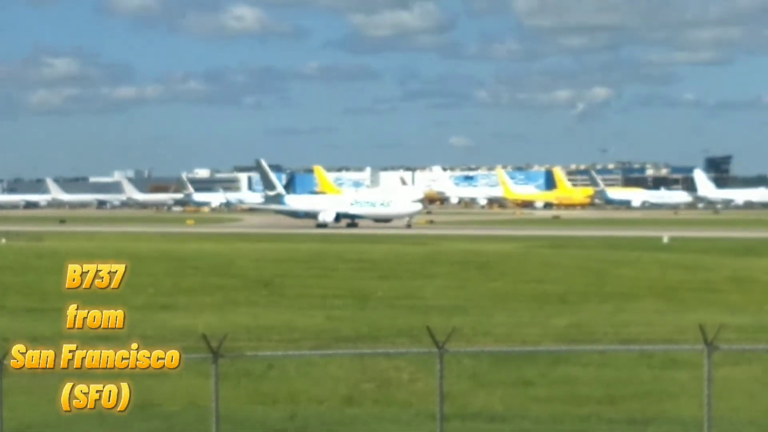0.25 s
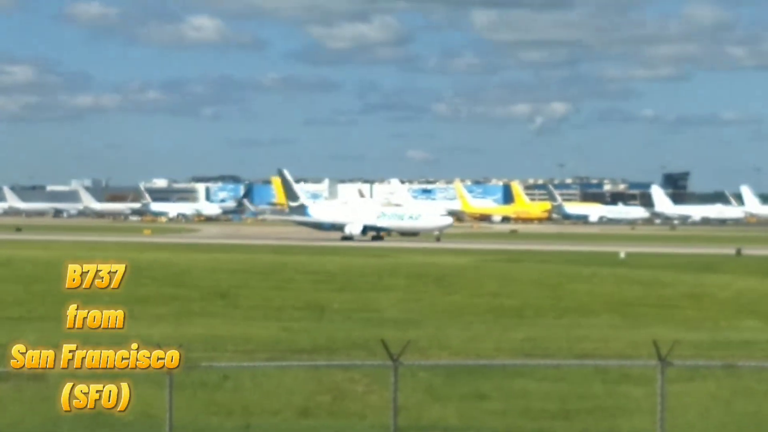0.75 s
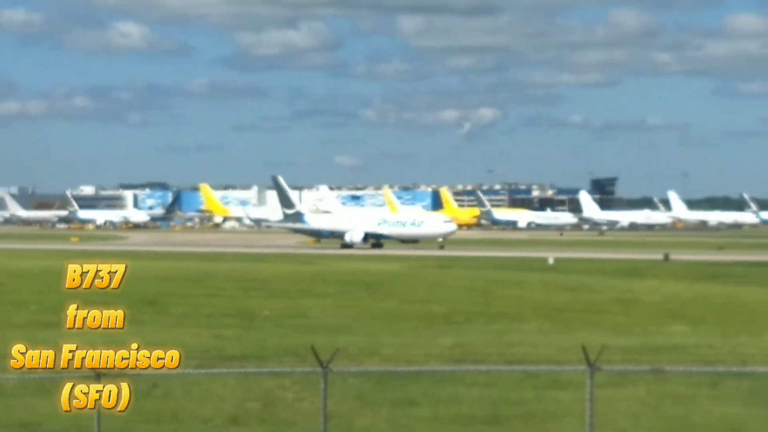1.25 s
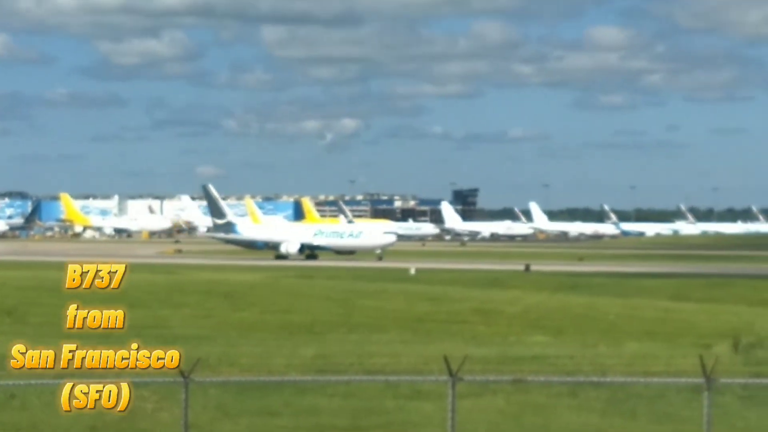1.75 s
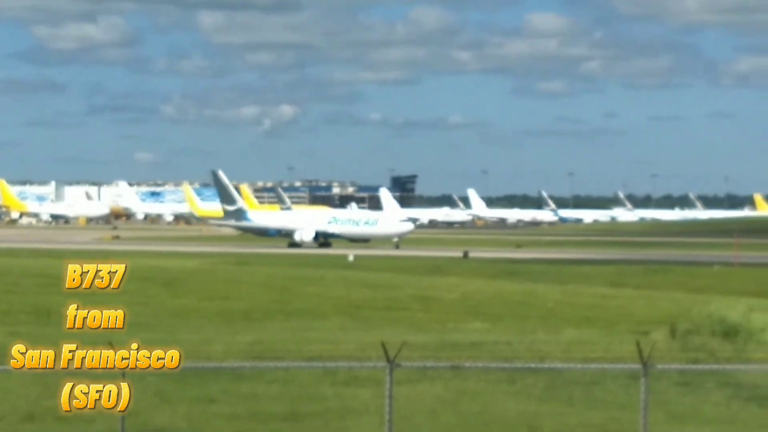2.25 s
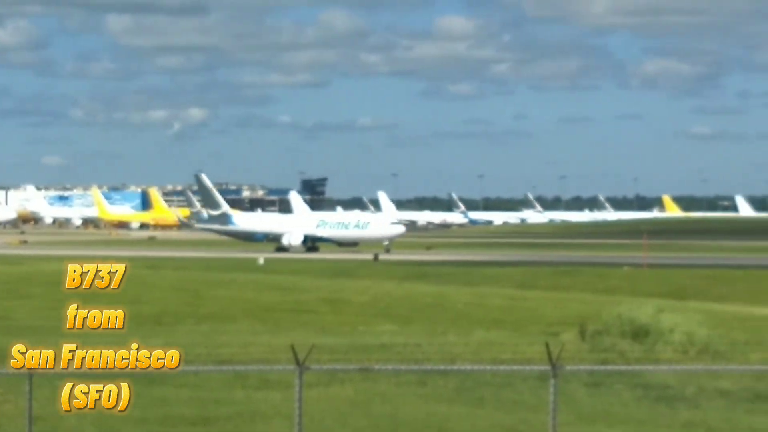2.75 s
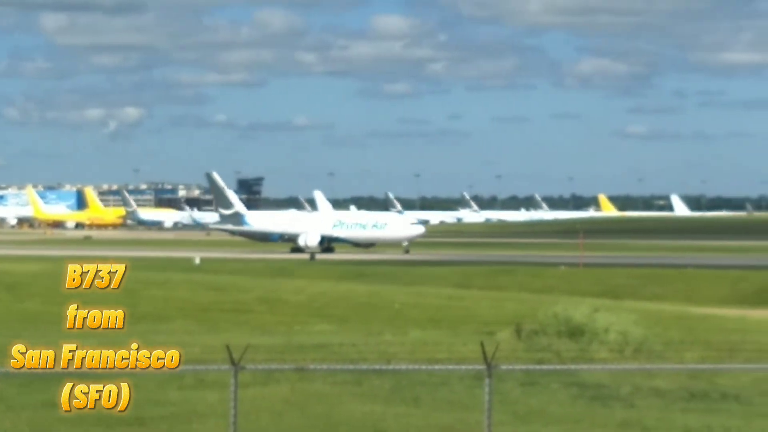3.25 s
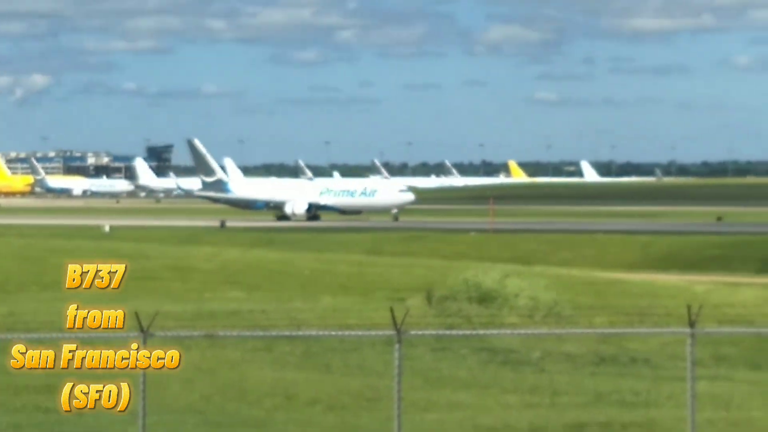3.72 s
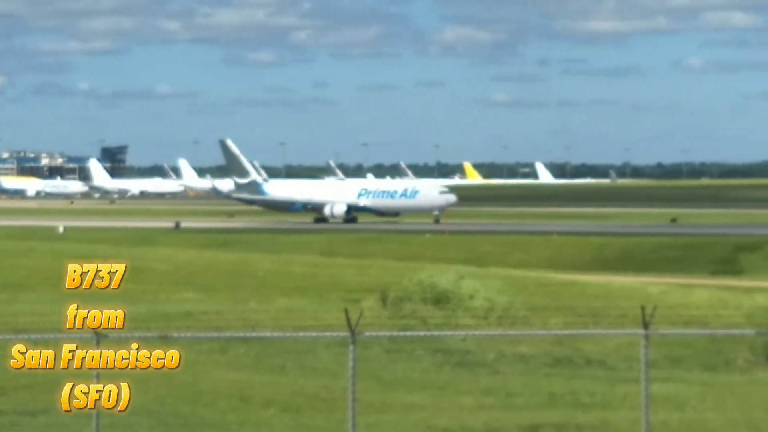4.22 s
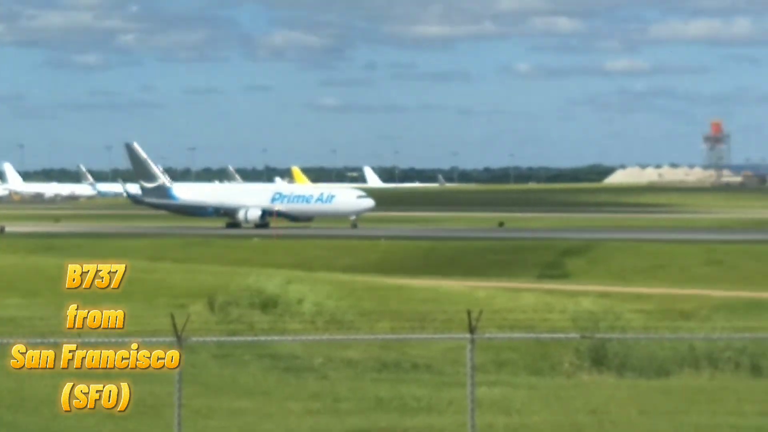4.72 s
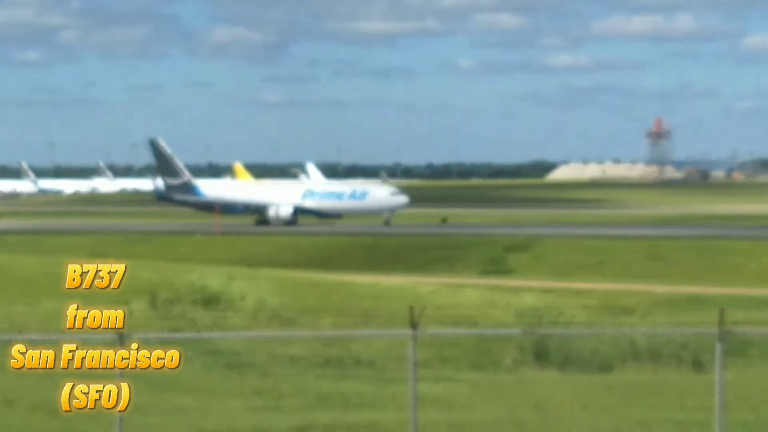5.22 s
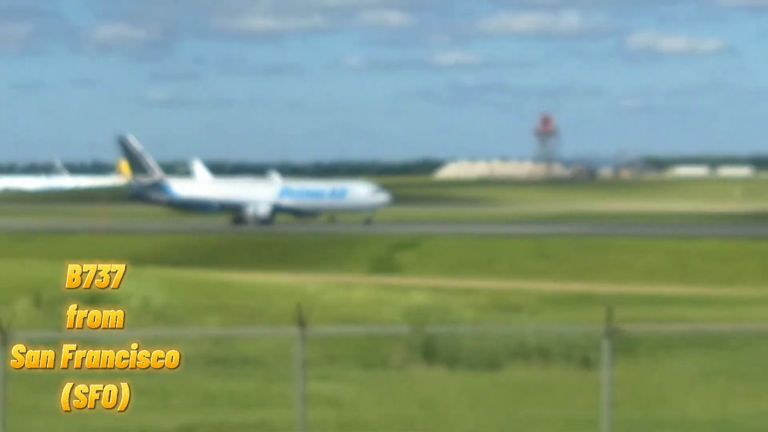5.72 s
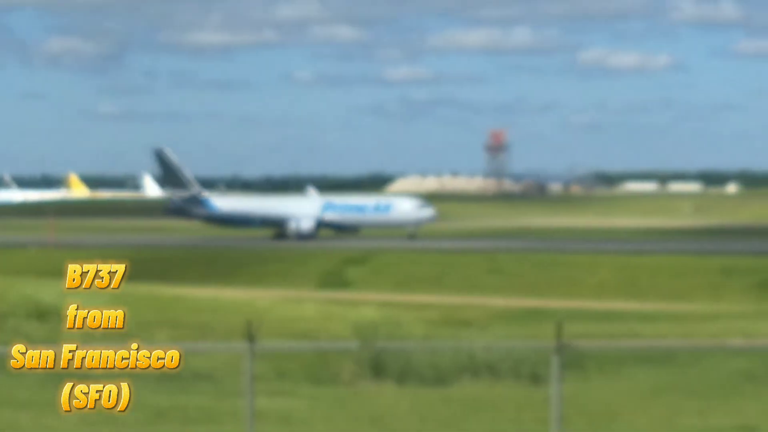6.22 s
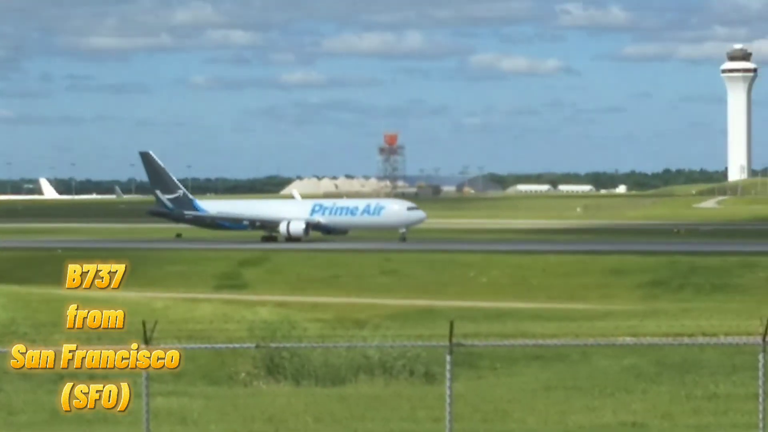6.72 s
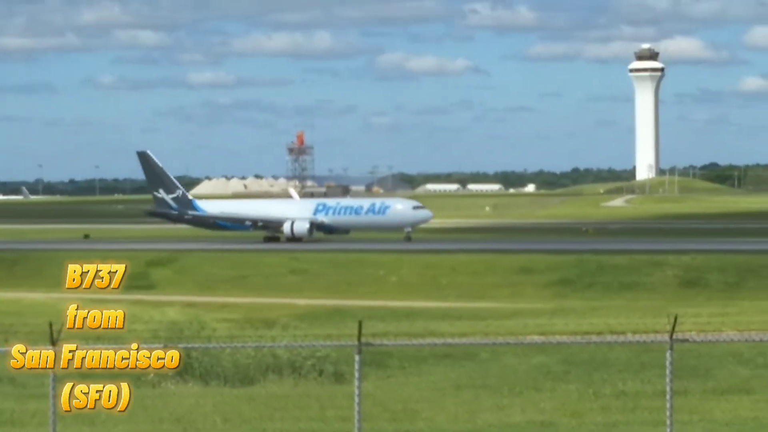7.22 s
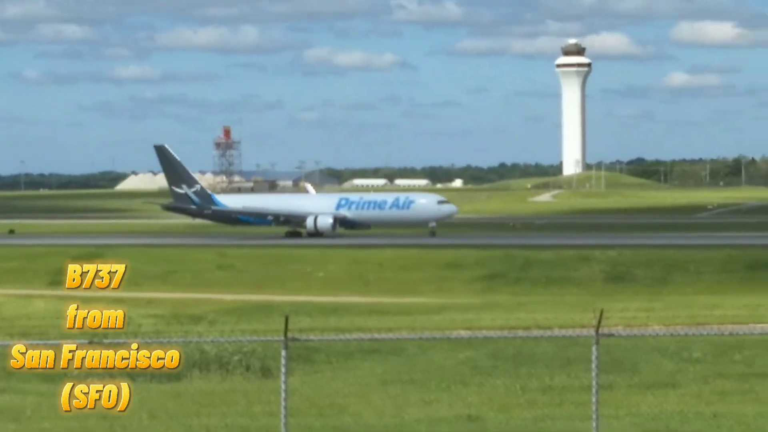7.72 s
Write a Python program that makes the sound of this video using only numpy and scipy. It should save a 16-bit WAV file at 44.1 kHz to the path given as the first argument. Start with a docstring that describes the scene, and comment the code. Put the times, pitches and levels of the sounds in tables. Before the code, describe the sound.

Wind buffets a phone microphone with low thuds as a far-off cargo jet rolls past, its steady whine sinking lower as the engines ease back.

```python
"""Cargo jet rolling past in wind

A twin-engined cargo jet rolls along a runway a few hundred metres off, heard across grass from a phone.
Coloured noise makes the exhaust roar, fan rush and turbine hiss; blade tones whine, then slide down in
pitch as the engines spool back. Wind rumbles, buffets and thumps on the phone's two ports as gusted noise
and short pulses, over soft rustles and thin hiss. The ports are cross-fed to widen the stereo."""
import sys
import numpy as np
from scipy import signal
from scipy.fft import rfft, irfft, next_fast_len
from scipy.io import wavfile
from scipy.ndimage import uniform_filter1d

SR = 44100
rng = np.random.default_rng(int(sys.argv[2]) if len(sys.argv) > 2 else 0)


def wav_out(sig):
    """Save sig, one row per channel (or a flat mono array), as 16-bit PCM at SR to the path in sys.argv[1]."""
    wavfile.write(sys.argv[1], SR, np.round(np.clip(np.atleast_2d(sig).T, -1, 1) * 32767).astype(np.int16))


N = 351023
SIZE = next_fast_len(N)
TIME, HZ = np.arange(N) / SR, np.arange(SIZE // 2 + 1) * SR / SIZE


def undb(db):
    """Decibels to amplitude gain."""
    return 10 ** (np.asarray(db) / 20)


def curve(rows):
    """Second column of a table, joined by straight lines in time."""
    time_s, value = np.transpose(rows)
    return np.interp(TIME, time_s, value)


def colour(points):
    """Gain at each frequency from (Hz, dB) points, joined over log frequency."""
    hz, db = np.transpose(points)
    return undb(np.interp(np.log(HZ + 1), np.log(hz), db))


def shape(x, gain):
    """Filter by a gain at each frequency."""
    return irfft(rfft(x, SIZE) * gain, SIZE)[..., :N]


def unit(x):
    """Scale to rms 1."""
    return x / np.sqrt(np.mean(x ** 2))


def noise(channels=2):
    """Unrelated white noises."""
    return rng.standard_normal((channels, N))


def walk(rate_hz):
    """Smooth random signal of rms 1, noise low-passed around rate_hz."""
    return unit(shape(noise(channels=1)[0], np.exp(-.5 * (HZ / rate_hz) ** 2)))


def even(x, span_s):
    """Noise with its own slow swells taken out."""
    power = uniform_filter1d(np.mean(x ** 2, axis=0), max(int(span_s * SR), 2))
    return x / np.sqrt(np.abs(power) + 1e-12)


def delay(ms):
    """Response of a pure delay."""
    return np.exp(-2j * np.pi * HZ * ms / 1000)


CROSS_LAG_MS, CROSS_FEED = 0.4278, 0.82


def widen(left, right):
    """Response of both channels: each port has the other, delayed, subtracted; mean power stays flat."""
    cross = CROSS_FEED * delay(CROSS_LAG_MS)
    pair = np.array([left - cross * right, right - cross * left])
    return pair / np.sqrt(np.mean(np.abs(pair) ** 2, axis=0) + 1e-12)


def at_ports(pair, gain=1):
    """Two unrelated signals, one on each port, then cross-fed."""
    return shape(pair[0], gain * widen(1, 0)) + shape(pair[1], gain * widen(0, 1))


# Left-right balance set by the phone's body, before cross-feed.
# Each row: frequency in Hz, left over right in dB.
BODY_BALANCE = [(100, -15), (900, 4), (1150, -15.5), (1350, 11), (1650, 0), (1900, 13.5), (2150, 5),
                (2400, 44), (3000, -5), (8000, 17.5)]
PORT_LAG_MS = 0.11


def from_runway(x, gain=1):
    """Far sound reaches the left port a little before the right."""
    return shape(x, gain * widen(colour(BODY_BALANCE), delay(PORT_LAG_MS)))


def far_noise(spectrum, scatter_db):
    """Jet noise at rms 1: a direct part and one scattered by the field, whose share grows in the bass."""
    gain = colour(spectrum)
    scatter = undb(scatter_db) + (260 / (HZ + 50)) ** 2
    gain = gain / np.sqrt(1 + scatter ** 2)
    direct = from_runway(noise(channels=1)[0], gain)
    scattered = at_ports(noise(), gain * scatter)
    return unit(direct + scattered)


def aircraft():
    """Exhaust roar, fan rush, whine and turbine hiss share one loudness as the jet rolls by."""
    return (roar() + rush() + whine() + turbine_hiss()) * undb(loudness())


# Aircraft level before dips. Each row: time in seconds, relative level in dB.
ROLL_BY = [(0, -40), (.8, -38.5), (1.3, -37.5), (2, -40), (3.15, -34.5), (3.7, -35.5), (4.6, -39),
           (5.05, -37.5), (5.8, -41.5), (6.7, -43.5), (7.95, -42.5)]
# Abrupt level dips. Each row: time in seconds, depth in dB.
DIPS = [(0.391, 3), (.85, 6.5), (1.36, 5.5), (1.5, 7), (3.24, 3.5), (3.37, 2), (3.64, 3), (3.8, 1),
        (4.2, 1), (5.14, 1.5), (5.36, 3), (5.65, 0.5), (5.82, 5), (6.715, 5.5), (7.51, 3.5), (7.66, 5)]
DIP_ATTACK_S, DIP_HOLD_S, DIP_RECOVERY_S = 0.013, 0.091, 0.93


def loudness():
    """Aircraft level in dB; each dip drops abruptly, stays down, then creeps back exponentially."""
    db = curve(ROLL_BY)
    for s, depth_db in DIPS:
        fall = np.clip((TIME - s) / DIP_ATTACK_S + .5, 0, 1)
        recovery = np.exp(-np.maximum(TIME - s - DIP_HOLD_S, 0) / DIP_RECOVERY_S)
        db = db - depth_db * fall * recovery
    return db


# Exhaust spectrum. Each row: frequency in Hz, relative density in dB.
ROAR_SPECTRUM = [(50, -18), (100, 6.5), (200, 6), (330, -3.5), (470, -4), (680, 2), (820, -0.5), (1000, -5),
                 (1400, -1.5), (1700, -7), (2200, -1.5), (3500, -67.5), (9000, -83)]
# Weight of the roar in the jet. Each row: time in seconds, relative level in dB.
THRUST = [(0, 7.5), (2.6, 4.5), (3.2, 4.5), (5, 6), (5.7, 4), (7, 2.7), (7.95, 2.5)]


def roar():
    """Low exhaust noise whose level wavers at a slow and a faster rate."""
    level_db = curve(THRUST) + 11.5 + 1.45 * walk(3.3) + 0.41 * walk(18)
    return far_noise(ROAR_SPECTRUM, scatter_db=-41.0) * undb(level_db)


# Fan noise spectrum. Each row: frequency in Hz, relative density in dB.
RUSH_SPECTRUM = [(400, -8.5), (1200, 0.5), (1800, -6.5), (2200, -5), (2500, 4), (3000, -0.5), (3500, -6.5),
                 (4000, -11.5), (5000, -22), (6000, -35.5), (7000, -56), (9000, -59)]


def rush():
    """Broad fan noise, gently wavering."""
    return far_noise(RUSH_SPECTRUM, scatter_db=-5.5) * undb(8.5 + 0.69 * walk(5.1))


# Both engines. Each row: spool-back time in seconds, blade-passing frequency at first in Hz,
# relative level in dB, blur in Hz, steady amplitude share from 0 to 1.
ENGINES = [(4.88, 2140, 0, 26, .72), (5.26, 2150, -4, 62, .25)]
# Level of the blade tones in the jet. Each row: time in seconds, relative level in dB.
WHINE_LEVEL = [(0, 5), (1.8, 3.5), (2.6, 6), (4, 5), (4.8, 7), (5.12, 11.5), (5.5, 11.5), (5.8, 13.5),
               (6.3, 11.5), (6.7, 10), (7.2, 9), (7.55, 6), (7.95, -3)]
BEAM_S, BEAM_WIDTH_S, BEAM_DB, OFF_BEAM_DB = 6.45, 0.62, -6.5, -26


def whine():
    """Blade tones of two engines; their octave is beamed sideways and sweeps past."""
    beam = 1 / (1 + ((TIME - BEAM_S) / BEAM_WIDTH_S) ** 2)
    octave_db = OFF_BEAM_DB + (BEAM_DB - OFF_BEAM_DB) * beam
    fans = 0
    for spool_back_s, start_hz, db, blur_hz, steady in ENGINES:
        pitch_hz = fan_pitch(spool_back_s, start_hz)
        fans = fans + fan(pitch_hz, octave_db, blur_hz, steady) * undb(db)
    return from_runway(fans) * undb(curve(WHINE_LEVEL))


SAG_HZ_PER_S, IDLE_HZ, SPOOL_S, SPOOL_EASE = 14, 1380, 1.59, 1.47


def fan_pitch(spool_back_s, start_hz):
    """The pitch in Hz sags slowly under power, then eases into a fall that levels out towards idle."""
    powered = start_hz - SAG_HZ_PER_S * np.minimum(TIME, spool_back_s)
    spooling = np.maximum(TIME - spool_back_s, 0) / SPOOL_S
    return IDLE_HZ + (powered - IDLE_HZ) * np.exp(-spooling ** SPOOL_EASE)


WOBBLE_HZ, WOBBLE_RATE_HZ = 6, 5.95


def fan(hz, octave_db, blur_hz, steady):
    """Blade tone and octave; turbulent air scatters each into a flickering band, wider for the octave."""
    phase = 2 * np.pi * np.cumsum(hz + WOBBLE_HZ * walk(WOBBLE_RATE_HZ)) / SR
    out = 0
    for k, db in enumerate([0, octave_db], start=1):
        scattered = (walk(k * blur_hz) + 1j * walk(k * blur_hz)) / np.sqrt(2)
        path = steady + np.sqrt(1 - steady ** 2) * scattered
        out = out + np.imag(path * np.exp(1j * k * phase)) * undb(db)
    return out


# Hot-section spectrum. Each row: frequency in Hz, relative density in dB.
TURBINE_SPECTRUM = [(3000, -8.5), (4200, -0.5), (5000, -2), (5800, -8.5), (6500, -18), (8000, -32),
                    (10000, -39.5)]
# Hiss level as the tail turns this way. Each row: time in seconds, relative level in dB.
TAIL = [(0, -45), (3, -23.5), (4.5, -12.5), (5.2, -10), (6.1, -6), (7, -7.5), (7.95, -5)]


def turbine_hiss():
    """Hot-section hiss, mostly scattered, heard more as the tail turns this way."""
    return far_noise(TURBINE_SPECTRUM, scatter_db=23.5) * undb(curve(TAIL))


# Breeze on the ports. Each row: time in seconds, relative level in dB.
BREEZE = [(0, -26.5), (.75, -29.5), (.95, -37), (1.3, -38), (1.65, -36.5), (2.05, -38), (2.3, -33.5),
          (2.65, -34.5), (2.85, -35), (3.05, -26.5), (3.5, -32), (4, -31), (4.6, -30), (5, -27.5),
          (5.55, -31), (6.5, -30.5), (6.9, -32.5), (7.3, -31), (7.95, -27.5)]
# Gusts that swell and pass. Each row: peak time in seconds, half-power duration in seconds,
# relative rumble level in dB, relative fine turbulence level in dB.
GUSTS = [(0.132, 0.036, -31, -31), (0.363, 0.082, -32.5, -32), (0.46, .025, -38, -24.5),
         (0.588, 0.035, -22.5, -25), (0.828, 0.019, -24.5, -28), (1.154, 0.056, -30.5, -56),
         (1.356, 0.042, -25, -20), (1.432, 0.069, -32, -20), (1.488, 0.022, -23, -24),
         (1.677, 0.15, -51, -32.5), (1.74, 0.061, -49, -30), (1.915, 0.07, -42, -30.5),
         (2.144, 0.1, -38, -32.5), (2.54, 0.026, -33, -36), (3.036, 0.09, -29, -39),
         (3.262, 0.11, -26, -27), (3.624, 0.06, -30, -29.5), (3.782, 0.15, -38, -24.5),
         (3.988, 0.14, -29, -25), (4.208, 0.039, -25.5, -28), (4.416, 0.065, -25, -25.5),
         (4.487, 0.035, -38, -30.5), (4.795, 0.037, -39, -31), (5.163, 0.045, -22, -44),
         (5.318, 0.066, -29, -32), (5.645, 0.034, -19, -27.5), (5.811, 0.012, -18, -28),
         (5.92, 0.058, -26.5, -55), (6.08, 0.028, -29, -32.5), (6.215, 0.069, -29, -27.5),
         (6.45, 0.042, -25, -33), (6.604, .06, -30.5, -44), (6.734, 0.038, -29, -32),
         (7.04, 0.1, -29.5, -36), (7.113, 0.038, -37, -31), (7.507, 0.022, -21.5, -31),
         (7.678, 0.15, -29.5, -30.5), (7.81, 0.2, -29, -32.5), (7.95, 0.03, -34, -24)]
UNREST_DB, UNREST_HZ, CHURN_DB = 2.5, 20, -19


def wind():
    """Amplitudes of pressure and fine turbulence: powers of a wavering breeze and gusts add."""
    breeze_db = curve(BREEZE) + UNREST_DB * walk(UNREST_HZ)
    pressure, churn = undb(breeze_db) ** 2, undb(breeze_db + CHURN_DB) ** 2
    for s, length_s, rumble_db, churn_db in GUSTS:
        swell = bell(s, length_s)
        pressure = pressure + undb(rumble_db) ** 2 * swell
        churn = churn + undb(churn_db) ** 2 * swell
    return np.sqrt(pressure), np.sqrt(churn)


def bell(s, length_s):
    """A swell in power that peaks at s and stays above half for length_s."""
    return 2 ** -np.minimum((2 * (TIME - s) / length_s) ** 2, 200)


# Rumble spectrum. Each row: frequency in Hz, relative density in dB.
RUMBLE_SPECTRUM = [(20, -40.5), (32, -33.5), (50, -3.5), (70, -1.5), (90, -0.5), (125, -2.5), (190, -7.5),
                   (300, -16.5), (500, -30.5), (1000, -53), (2500, -82.5), (8000, -110)]


def rumble(pressure):
    """Large eddies press on each port separately, and a little on both at once."""
    gain = colour(RUMBLE_SPECTRUM)
    apart = at_ports(noise() * undb([[-5], [0]]), gain)
    together = shape(noise(channels=1)[0], gain * widen(0.86, 0.8)) * undb(-13.5)
    return even(apart + together, span_s=0.14) * pressure * undb(8.0)


# Soft and hard buffet spectra. Each row: frequency in Hz, relative density in dB.
SOFT_BUFFET = [(40, -20.5), (120, -2.5), (250, 6.5), (340, 3.5), (600, -4.5), (850, -11.5), (1150, -24.5),
               (1600, -35.5), (3500, -53.5), (9000, -83)]
HARD_BUFFET = [(100, -21), (190, 12), (300, -4.5), (480, 1), (850, -2.5), (1150, -12.5), (1600, -21),
               (2200, -26), (3500, -40.5), (6000, -70), (10000, -93.5)]


def buffets(churn):
    """Bursts of turbulence; faster air sheds smaller eddies, so hard blows are brighter."""
    power = churn ** 2
    hard = power / (power + undb(-20.5) ** 2)
    blend = np.sqrt(1 - hard) * eddies(SOFT_BUFFET) + np.sqrt(hard) * eddies(HARD_BUFFET)
    # the narrow port rounds off the sharpest puffs
    port = colour([(1300, 1.0), (3500, 1.0), (8000, -19.0)])
    return shape(blend * churn, port) * undb(3.5)


def eddies(spectrum):
    """Ragged turbulence that tears over the right port and grazes the left."""
    ragged = noise() * undb([[-12], [0]]) * undb(5.4 * walk(160))
    return even(at_ports(ragged, colour(spectrum)), span_s=0.019)


# Hardest single eddies, small as knocks, large as low thuds. Each row: peak time in seconds,
# relative level in dB, envelope scale in seconds, centre frequency in Hz.
HARD_EDDIES = [(.09, -20.5, 0.0039, 423), (.324, -14, 0.013, 370), (.397, -7.5, .014, 130),
               (.515, -8, 0.0089, 140), (.822, -17, 0.0037, 570), (.85, -3.5, 0.014, 115),
               (1.328, -12, 0.0052, 830), (1.356, -14.5, 0.0082, 595), (1.364, -10, 0.011, 650),
               (1.411, -12.5, 0.0057, 880), (1.427, -18, 0.0028, 770), (1.441, -17, 0.0048, 850),
               (1.455, -15, 0.0033, 850), (1.481, -20, 0.0039, 900), (1.494, -19, 0.0074, 750),
               (1.497, -4.5, 0.011, 110.5), (2.137, -26, 0.0041, 400), (2.535, -15.5, 0.0038, 443),
               (3.228, -10, 0.0023, 497), (3.241, -16.5, 0.0044, 590), (3.264, -18, .012, 147),
               (3.376, -9.5, .014, 135), (3.614, -13, 0.002, 690), (3.644, -12, 0.0078, 537),
               (3.742, -11, 0.0033, 700), (3.765, -19, 0.0034, 550), (3.791, -9, 0.0041, 710),
               (3.932, -12, 0.0033, 700), (4.013, -17, 0.0051, 625), (4.216, -20, 0.018, 169),
               (4.375, -18, 0.0032, 660), (4.397, -12, 0.0088, 620), (4.507, -6, 0.011, 115),
               (4.602, -16.5, 0.0087, 380), (4.753, -11.5, 0.028, 115), (5.147, -15, .015, 129),
               (5.297, -10.5, 0.0048, 400), (5.323, -15, 0.0028, 480), (5.353, -11.5, 0.0057, 650),
               (5.375, -9.5, 0.021, 147), (5.641, -17, 0.016, 464), (5.657, -10, 0.0099, 137),
               (5.817, -5, 0.014, 121), (5.821, -12.5, 0.0029, 510), (5.89, -25, 0.0049, 227),
               (6.061, -17.5, 0.0088, 500), (6.193, -19, 0.0073, 460), (6.221, -27, 0.0036, 398),
               (6.337, -18, 0.0076, 340), (6.716, -9.5, 0.013, 139), (6.719, -18.5, 0.0065, 500),
               (6.969, -22.5, 0.0097, 416), (7.102, -19.5, 0.0043, 620), (7.112, -23.5, 0.0082, 600),
               (7.272, -18.5, 0.0043, 467), (7.348, -6, 0.0092, 116), (7.39, -15, 0.005, 520),
               (7.511, -15.5, 0.004, 614), (7.581, -12.5, 0.0019, 646), (7.599, -13, 0.0034, 490),
               (7.65, -19, .004, 450), (7.653, -10, 0.011, 116), (7.67, -18, 0.0028, 330),
               (7.673, -8.5, 0.012, 150), (7.702, -21.5, .003, 620), (7.711, -18, 0.011, 526),
               (7.816, -15, 0.0032, 700), (7.822, -16, 0.019, 95), (7.927, -11.5, 0.003, 764)]
EDDY_OCTAVES, EDDY_RISE = 0.69, 0.85


def thumps(size=4096):
    """Single eddies strike the right port: a few irregular pressure swings around each one's own pitch."""
    rows = list(HARD_EDDIES) + lesser_eddies()
    t, f = (np.arange(size) - size // 2) / SR, np.fft.fftfreq(size, 1 / SR)
    out = np.zeros(N + 2 * size)
    for (s, db, length_s, hz), chance in zip(rows, rng.standard_normal((len(rows), size))):
        octaves_off = np.log2(np.maximum(f, 1) / hz)
        band = np.exp(-.5 * (octaves_off / EDDY_OCTAVES) ** 2)
        swirl = np.fft.ifft(np.fft.fft(chance) * band / np.sqrt(np.abs(f) + 1))
        power = np.abs(swirl) ** 2
        # flatten the swirl's own envelope
        swing = swirl.real / np.sqrt(power + 0.11 * np.mean(power))
        width_s = length_s * np.where(t < 0, EDDY_RISE, 2 - EDDY_RISE)
        envelope = 1 / (1 + np.sqrt(2) * (t / width_s) ** 2) ** np.sqrt(2)
        start = int(s * SR)
        out[start:start + size] += swing * undb(db) * envelope
    port = colour([(25, -30.5), (50, -3.5), (80, 3.5), (1200, -1.5), (2200, -11.5), (4000, -16.0),
                   (8000, -32.5)])
    return shape(out[size // 2:][:N], port * widen(0.084, 1.0))


EDDIES_PER_S, EDDY_DB, EDDY_SPREAD_DB, EDDY_S, EDDY_HZ = 8, 6, 7, 0.0051, 302


def lesser_eddies():
    """Small eddies at random moments, levels scattered about the breeze; rows as in HARD_EDDIES."""
    chance = rng.random(size=(128, 3))
    times = np.cumsum(2 * chance[:, 0]) / EDDIES_PER_S
    breeze_db = np.interp(times, *np.transpose(BREEZE))
    levels_db = breeze_db + EDDY_DB + EDDY_SPREAD_DB * (2 * chance[:, 1] - 1)
    pitches = EDDY_HZ * 2 ** (chance[:, 2] - .5)
    return [(s, db, EDDY_S, hz) for s, db, hz in zip(times, levels_db, pitches) if s < N / SR]


# Faint high patches. Each row: peak time in seconds, half-amplitude duration in seconds,
# centre in Hz, half-amplitude width in Hz, relative level in dB.
RUSTLES = [(.515, 0.04, 5800, 1200, -62), (.61, 0.11, 9200, 1400, -69), (.68, 0.37, 8500, 2000, -71.5),
           (.66, 0.26, 14000, 2000, -72), (1.12, 0.48, 5300, 600, -62), (3.897, 0.023, 7200, 900, -60),
           (6.15, 0.38, 7660, 900, -70.5)]


def rustles():
    """Brief soft patches of high band noise with bell-shaped swells."""
    out = 0
    for s, length_s, hz, width_hz, db in RUSTLES:
        band = unit(shape(noise(channels=1)[0], 2 ** -((2 * (HZ - hz) / width_hz) ** 2)))
        out = out + band * undb(db) * 2 ** -((2 * (TIME - s) / length_s) ** 2)
    return from_runway(out)


def hiss():
    """Thin noise, separate on each port plus a faint opposed part, that slightly follows the aircraft."""
    air = colour([(5000, 4.0), (9000, 0.0), (14000, 1.0), (15500, -3.5)])
    apart = unit(at_ports(noise(), air)) * undb([[-1], [1]])
    opposed = unit(shape(noise(channels=1)[0], air)) * np.array([[-1], [1]])
    level_db = -66.0 + 0.23 * (loudness() + 45.5) + 0.059 * (curve(TAIL) + 24.0)
    return (apart + undb(-16.5) * opposed) * undb(level_db)


def scene():
    """The aircraft far off, the wind on the ports, and faint high noise."""
    pressure, churn = wind()
    return aircraft() + thumps() + rumble(pressure) + buffets(churn) + rustles() + hiss()


TOP_HZ = 15400


def record(dry):
    """The phone clips the peaks at full scale, then a steep low-pass cuts the top."""
    held = np.clip(dry, -1, 1)
    low_pass = signal.ellip(12, .1, 80, TOP_HZ, fs=SR, output="sos")
    return signal.sosfilt(low_pass, held)


dry = scene()
out = record(dry)
wav_out(out)
```